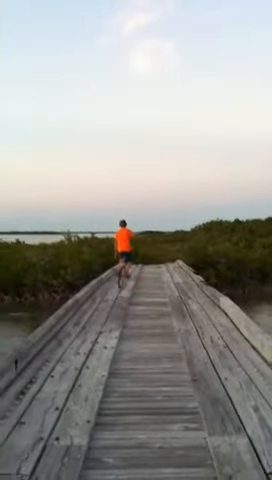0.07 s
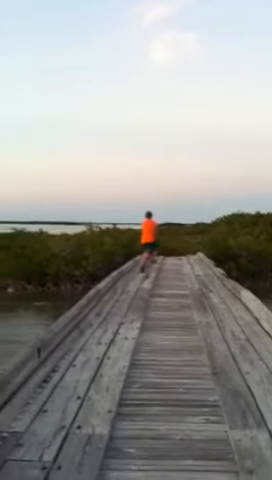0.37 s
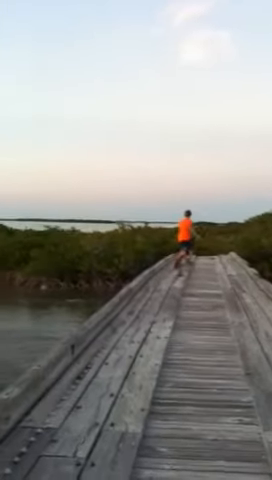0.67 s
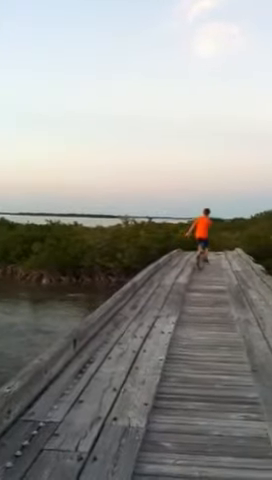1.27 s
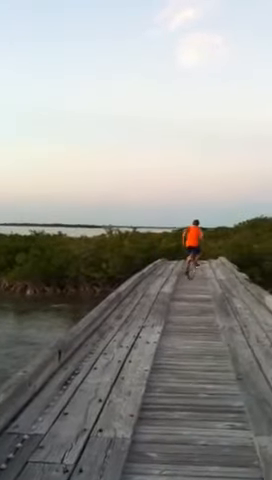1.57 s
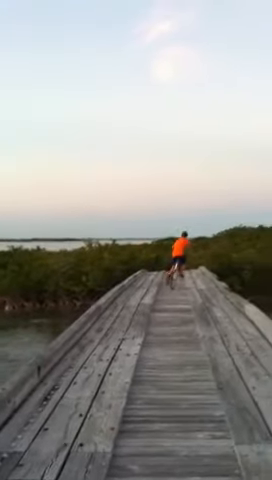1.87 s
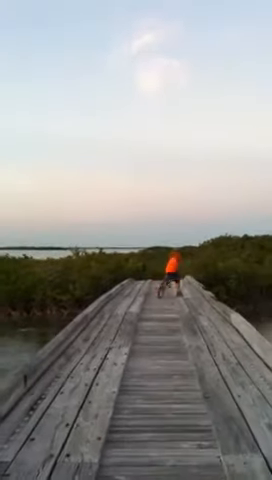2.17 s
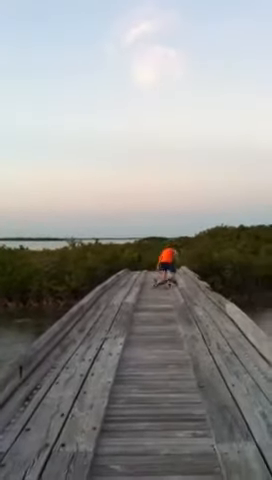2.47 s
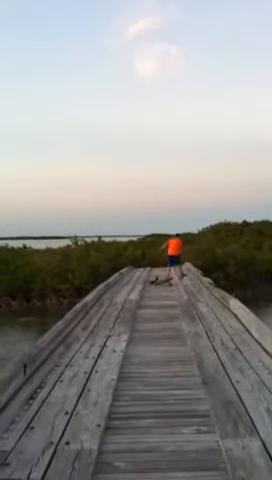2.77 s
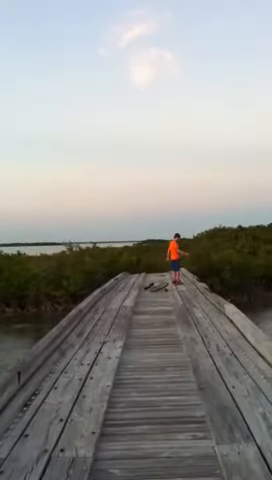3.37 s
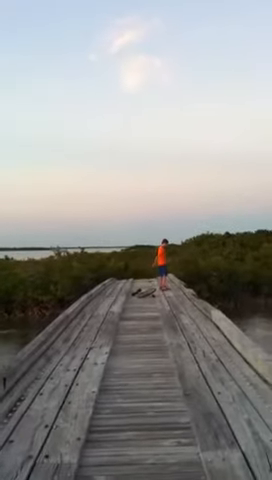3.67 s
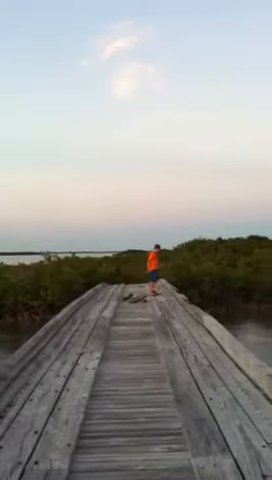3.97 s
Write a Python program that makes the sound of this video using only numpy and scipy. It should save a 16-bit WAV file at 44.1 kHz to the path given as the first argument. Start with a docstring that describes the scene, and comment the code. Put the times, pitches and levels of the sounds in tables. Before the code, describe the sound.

A unicycle slams onto wooden planks and rattles as wind buffets the microphone.

```python
"""Sea wind on the microphone, from first to last: eddies rumble, flutter and thump against it.
About two seconds in, some way along a wooden pier, a rider steps off a unicycle. Shoe and tyre scuff,
then it slams onto the planks, bounces and rattles to rest: boards and frame ring, a pedal scrapes.
Faint calls carry from far off, over the recorder's own hiss and thin whine."""
import sys
import numpy as np
from scipy import signal
from scipy.fft import rfft, irfft
from scipy.io import wavfile
from scipy.ndimage import uniform_filter1d

SR = 44100
rng = np.random.default_rng(int(sys.argv[2]) if len(sys.argv) > 2 else 0)


def file_out(sig):
    """Save sig as 16-bit WAV at sys.argv[1]."""
    # one column per channel
    cols = np.atleast_2d(sig).T
    # limit, then scale
    lim = np.clip(cols, -1, 1)
    pcm = np.round(lim * 32767).astype(np.int16)
    wavfile.write(sys.argv[1], SR, pcm)


N = 176400  # 4 s

# Levels in the tables are relative: each source sets its own gain.
# blows on the deck (time [s], plank thud [dB], frame clatter [dB], sharp tick [dB])
BLOWS = [(2.178, -27.5, -45.5, -64), (2.456, -48, -51, -47), (2.526, -13, -48, -70),
         (2.5289, -53, -28.5, -22), (2.542, -22.5, -32, -51), (2.550, -13.5, -40, -57),
         (2.6379, -59, -48, -45), (2.685, -27.5, -40, -32), (2.7241, -55, -46, -38),
         (2.7436, -46, -45, -35.5), (2.7789, -43, -44, -45), (2.860, -48, -51.5, -48),
         (2.9067, -58, -50.5, -55)]
# resonances of the planks, and of the frame and pedals (frequency [Hz], level [dB])
PLANK_MODES = [(224, -4), (366, -7), (455, -10), (501, 0), (541, -13), (592, -8), (659, -18), (692, -16),
               (770, -20), (898, -18), (997, -20)]
FRAME_MODES = [(1042, -1), (1222, -3), (1369, 0), (1481, 1), (1751, -2), (1901, -4), (2067, -4), (2155, 0),
               (2323, -1), (2530, -9), (2666, -9), (3145, -17)]
# noise of knocked wood, rattling frame, hard contact and rubbing (frequency [Hz], level [dB])
KNOCK_SPECTRUM = [(80, -30), (250, -4), (400, 1), (520, 1), (640, -4), (780, -13), (1100, -21), (2500, -44),
                  (8000, -70)]
CLATTER_SPECTRUM = [(200, -1), (600, 14.5), (1100, 3), (1500, 3.5), (2250, 0), (2800, -11), (9000, -23),
                    (16000, -26)]
TICK_SPECTRUM = [(500, 12.5), (2000, 6), (4000, -1), (7200, -5), (8500, 2), (10000, -9), (11500, -5),
                 (14000, -15), (17000, -30)]
SCUFF_SPECTRUM = [(300, -8), (1000, 0.5), (4200, -8), (7000, -17), (15000, -25)]
# shoe and tyre rubbing the wood (centre time [s], half width [s], level [dB])
SCUFFS = [(2.178, 0.0075, -65), (2.452, 0.012, -57.5)]
# a pedal sliding along the boards (time [s], ringing pitch [Hz], level [dB])
PEDAL_SLIDE = [(2.71, 1500, -82), (2.728, 1510, -53), (2.765, 1620, -68), (2.79, 1880, -72),
               (2.835, 1840, -66), (2.88, 2150, -67.5), (2.96, 2120, -82)]
# gusts at the microphone (time [s], rumble level [dB], flutter level [dB])
GUSTS = [(0, -63, -65.5), (.11, -76, -65), (0.171, -48.5, -68), (.3, -56.5, -87), (0.489, -42.5, -56),
         (0.549, -51, -76), (0.606, -31, -51), (0.678, -49.5, -73), (0.716, -39, -62), (.79, -65, -83),
         (.87, -49.5, -70), (0.936, -25, -27), (0.997, -37, -46), (1.048, -23.5, -29), (1.107, -27, -29),
         (1.133, -40, -47), (1.151, -21.5, -31.5), (1.239, -28, -31.5), (1.269, -31, -48),
         (1.339, -29.5, -34.5), (1.42, -30.5, -41), (1.486, -23.5, -23), (1.55, -24, -39.5),
         (1.66, -23.5, -33), (1.705, -23.5, -47), (1.781, -38.5, -52.5), (1.838, -28, -40),
         (1.92, -23, -29.5), (1.999, -20.5, -31.5), (2.073, -30.5, -47.5), (2.19, -32, -37.5),
         (2.262, -37.5, -49.5), (2.351, -28.5, -40), (2.42, -42.5, -75), (2.488, -33.5, -39),
         (2.56, -33.5, -73), (2.63, -31, -43), (2.69, -43.5, -41.5), (2.795, -36, -60), (2.84, -47, -78),
         (2.89, -27.5, -69), (2.941, -48, -51), (3.001, -31, -45.5), (3.092, -62, -82), (3.167, -27, -65),
         (3.21, -48.5, -54), (3.27, -24, -31.5), (3.33, -32.5, -52), (3.431, -33.5, -57), (3.461, -53, -62),
         (3.487, -28.5, -45.5), (3.529, -44, -65), (3.687, -56, -79), (3.759, -26, -61),
         (3.82, -35.5, -50.5), (3.879, -25, -31), (3.931, -18, -25.5), (4.0, -28, -33)]
# the wind's rumble, low roll, small eddies and finest eddies (frequency [Hz], level [dB])
RUMBLE_SPECTRUM = [(20, -44), (48, -43), (100, -10.5), (140, -3), (185, 1.5), (285, -4), (370, -12),
                   (520, -28), (1500, -74.5)]
ROLL_SPECTRUM = [(25, -17.5), (55, -1), (130, 13.5), (200, 18.5), (400, -45.5)]
FLUTTER_SPECTRUM = [(30, -48), (180, -7), (330, 2), (550, -4), (800, -18.5), (1600, -42), (2200, -71)]
FINE_SPECTRUM = [(200, -38), (600, 19.5), (1000, -10), (2000, -23), (3000, -45)]
# big eddies hitting the microphone, the narrow ones sharper (time [s], peak [dB], half width [s])
BUFFETS = [(.174, -30.5, 0.0023), (0.492, -24.5, 0.0017), (0.599, -24.5, 0.0013), (.632, -30.5, 0.001),
           (.945, -25, .0008), (.973, -24, 0.00082), (1.039, -16.5, 0.0011), (1.091, -19, 0.00046),
           (1.115, -15, 0.00074), (1.155, -25, 0.00048), (1.223, -26, 0.00075), (1.343, -16, 0.00091),
           (1.392, -17, 0.00077), (1.489, -21, 0.00044), (1.5, -22, 0.00043), (1.52, -30, 0.00039),
           (1.566, -15.5, 0.00067), (1.646, -18, 0.00068), (1.838, -23, 0.00062), (1.932, -20.5, 0.00072),
           (1.944, -18.5, 0.00075), (1.972, -17.5, 0.00087), (2.001, -16, 0.00079), (2.067, -19.5, 0.00088),
           (2.141, -21.5, 0.0009), (2.307, -21.5, 0.001), (2.366, -17.5, 0.001), (3.16, -19, 0.0012),
           (3.239, -15.5, 0.00097), (3.276, -19, 0.00077), (3.302, -12.5, 0.00096), (3.307, -36, 0.00024),
           (3.867, -17, .00066), (3.92, -13.5, 0.0008), (3.954, -14, 0.00083), (3.978, -14.5, 0.0009)]
# far calls, perhaps a bird (centre time [s], half width [s], level [dB], pitch [Hz], glide [Hz/s])
FAR_CALLS = [(0.157, 0.05, -69, 499, 62), (3.407, 0.063, -72, 507, 1), (3.495, 0.03, -70.5, 490, -350)]
# overtones of a call (multiple of the pitch [-], level [dB])
CALL_OVERTONES = [(2, -5), (3, -6), (4, 0), (7, -5)]
# the recorder's noise floor (frequency [Hz], level [dB])
HISS_SPECTRUM = [(30, 14), (200, -4), (600, 8.5), (1200, -1), (2500, -3), (6000, -4), (10000, -6),
                 (17000, -10)]

PLANK_DB, PLANK_T60_S, KNOCK_DB, KNOCK_T60_S = -5, .16, -6, .06
FRAME_DB, FRAME_T60_S, CLATTER_DB, CLATTER_T60_S = -8, .19, -9, .26
CONTACT_S, TICK_T60_S, TICK_TAIL_DB, TICK_TAIL_T60_S = .00078, .024, -31, .17
SLIPS_PER_S, SLIP_T60_S = 170, .027
RUMBLE_DB, PUFFS_PER_S, PUFF_DB, STEADY_S = 1, 28, 1.6, .13
FLUTTER_DB, EDDIES_PER_S, EDDY_SCATTER_DB = -1, 380, 5.5
STRONG_GUST_DB, ROLL_DB, FINE_DB = -30, -42, -65  # a strong gust, and these two layers' levels in it
ROLL_GROWTH, FINE_GROWTH = .27, 3  # dB gained per dB of gust
BUFFET_DB, BUFFET_LOW_HZ = 1, 171.5
CALL_WAVER, CALL_WAVERS_PER_S, CALL_ECHO_T60_S = .045, 140, .66
MIC_LOW_HZ, TOP_HZ = 65.6, 17200
HISS_DB, WHINE_DB, WHINE_HZ = -65, -73.5, 14999


def unicycle_blows():
    """Each blow thuds in the planks, rattles the frame and ticks where hard parts meet the wood."""
    out, t = np.zeros(N), np.arange(SR // 2) / SR
    noises = [noise(KNOCK_SPECTRUM), noise(CLATTER_SPECTRUM), noise(TICK_SPECTRUM)]
    push = 1 - np.exp(-(t / CONTACT_S) ** 2)  # the thud builds up during contact
    for start, thud_db, clatter_db, tick_db in BLOWS:
        i = rng.integers(N - len(t))
        knock, clatter, tick = (x[i:i + len(t)] for x in noises)
        plank = undb(PLANK_DB) * ring(t, PLANK_MODES, PLANK_T60_S, scatter_db=1)
        plank += undb(KNOCK_DB) * knock * fade(t, KNOCK_T60_S)
        frame = undb(FRAME_DB) * ring(t, FRAME_MODES, FRAME_T60_S, scatter_db=3)
        frame += undb(CLATTER_DB) * clatter * fade(t, CLATTER_T60_S)
        contact = tick * (fade(t, TICK_T60_S) + undb(TICK_TAIL_DB) * fade(t, TICK_TAIL_T60_S)) / 2
        blow = undb(thud_db) * plank * push + undb(clatter_db) * frame + undb(tick_db) * contact
        add(out, start, blow)
    return out


def scuffs(t):
    """Shoe and tyre rub the boards in short, gritty strokes."""
    grit = rng.standard_normal(N) ** 3  # cubing makes the noise spiky
    return colour(grit, SCUFF_SPECTRUM) * swells(t, SCUFFS)


def pedal_scrape(t):
    """The pedal sticks and slips; each slip rings a resonance that climbs as it slides."""
    when, hz, db = np.array(PEDAL_SLIDE).T
    slips = (rng.random(N) < SLIPS_PER_S / SR) * rng.standard_normal(N)
    carrier = np.exp(2j * np.pi * np.cumsum(np.interp(t, when, hz)) / SR)
    # each slip's decay follows the moving pitch
    ringing = carrier * signal.fftconvolve(slips / carrier, fade(t[:SR // 10], SLIP_T60_S))[:N]
    return unit(ringing.imag) * undb(np.interp(t, when, db, left=-np.inf, right=-np.inf))


def wind(t):
    """Turbulence rumbles on the microphone over a low roll; eddies flutter, finer in strong gusts."""
    when, rumble_points, flutter_points = np.array(GUSTS).T
    rumble_db, flutter_db = np.interp(t, when, rumble_points), np.interp(t, when, flutter_points)
    rumble = steady(noise(RUMBLE_SPECTRUM), STEADY_S)
    rumble *= undb(rumble_db + RUMBLE_DB + PUFF_DB * wander(PUFFS_PER_S))
    roll = noise(ROLL_SPECTRUM) * undb(ROLL_DB + ROLL_GROWTH * (rumble_db - STRONG_GUST_DB))
    eddies = (rng.random(N) < EDDIES_PER_S / SR) * rng.choice([-1, 1], N)
    eddies = eddies * undb(EDDY_SCATTER_DB * rng.standard_normal(N))
    flutter = steady(colour(eddies, FLUTTER_SPECTRUM), 2 * STEADY_S) * undb(flutter_db + FLUTTER_DB)
    fine = steady(colour(eddies, FINE_SPECTRUM), 2 * STEADY_S)
    fine *= undb(FINE_DB + FINE_GROWTH * (flutter_db - STRONG_GUST_DB))
    return rumble + roll + flutter + fine


def buffets(t):
    """A big eddy is a brief pressure bump; the microphone passes only its quick part and swings back."""
    out = np.zeros(N)
    high_pass = signal.butter(3, BUFFET_LOW_HZ, "high", fs=SR, output="sos")
    for when, db, half_width in BUFFETS:
        near = np.abs(t - when) < .04
        pressure = 1 / (1 + ((t[near] - when) / half_width) ** 2)
        thump = signal.sosfilt(high_pass, pressure)
        out[near] += undb(db + BUFFET_DB) * thump / np.abs(thump).max()
    return out


def far_calls(t):
    """Short nasal calls, blurred by echoes on their long way over water and scrub."""
    out = np.zeros(N)
    waver = 1 + CALL_WAVER * wander(CALL_WAVERS_PER_S)
    for when, half_width, db, hz, glide in FAR_CALLS:
        phase = 2 * np.pi * np.cumsum((hz + glide * (t - when)) * waver) / SR
        voice = sum(undb(tone_db) * np.sin(k * phase) for k, tone_db in CALL_OVERTONES)
        out += unit(voice) * swells(t, [(when, half_width, db)])
    echoes = rng.standard_normal(SR) * fade(t[:SR], CALL_ECHO_T60_S)
    return signal.fftconvolve(out, echoes / np.linalg.norm(echoes))[:N]


def ring(t, modes, t60, scatter_db):
    """Decaying modes set off from rest; each point of contact weights them a little differently."""
    hz, db = np.array(modes, float).T[:, :, None]
    gains = undb(db + scatter_db * rng.standard_normal(db.shape))
    tones = np.sum(gains * np.sin(2 * np.pi * hz * t), axis=0)
    return tones * fade(t, t60) / np.sqrt(np.sum(gains ** 2)) / 2


def colour(x, spectrum):
    """Filter through (frequency [Hz], level [dB]) points, to an rms of 1."""
    hz, db = np.array(spectrum, float).T
    bins_hz = np.maximum(np.fft.rfftfreq(N, 1 / SR), 1)
    gains = undb(np.interp(np.log(bins_hz), np.log(hz), db))
    cepstrum = irfft(np.log(gains), N)
    cepstrum[1:N // 2] *= 2  # folded onto positive time, so the filter is causal
    cepstrum[N // 2 + 1:] = 0
    return unit(irfft(rfft(x) * np.exp(rfft(cepstrum)), N))


def noise(spectrum):
    """Random noise with the given spectrum."""
    return colour(rng.standard_normal(N), spectrum)


def steady(x, seconds):
    """Even out swells slower than the given time."""
    size = max(int(seconds * SR / 2), 1)
    power = uniform_filter1d(uniform_filter1d(x ** 2, size), size)
    return x / np.sqrt(np.abs(power) + 1e-12)


def wander(rate):
    """Random values held 1 / rate seconds and smoothed twice, at an rms of 1."""
    size = int(SR / rate)
    held = np.repeat(rng.standard_normal(N // size + 1), size)
    return unit(uniform_filter1d(uniform_filter1d(held, size // 2), size // 2)[:N])


def swells(t, rows):
    """A bell-shaped swell for each row of (centre time [s], half width [s], level [dB])."""
    return sum(undb(db) * np.exp(-.5 * ((t - when) / half_width) ** 2) for when, half_width, db in rows)


def fade(t, t60):
    """Decay from t = 0, falling 60 dB in t60 seconds."""
    return (t >= 0) * np.exp(-np.log(1000) * np.maximum(t, 0) / t60)


def add(out, start, sound):
    """Mix a sound in at a start time in seconds."""
    i = int(start * SR)
    out[i:i + len(sound)] += sound[:max(N - i, 0)]


def undb(db):
    """Decibels to gain."""
    return 10 ** (np.asarray(db) / 20)


def unit(x):
    """Scale to an rms of 1."""
    return x / np.sqrt(np.mean(x ** 2))


def scene():
    """One microphone on the pier: wind right on it, the fall further along, calls far away."""
    t = np.arange(N) / SR
    return (wind(t) + buffets(t) + unicycle_blows() + scuffs(t) + pedal_scrape(t) + far_calls(t))[None]


def record(dry):
    """The microphone drops the deep bass; the recorder adds hiss and a thin whine, and cuts the top."""
    heard = signal.sosfilt(signal.butter(3, MIC_LOW_HZ, "high", fs=SR, output="sos"), dry)
    whine = np.sqrt(2) * undb(WHINE_DB) * np.sin(2 * np.pi * WHINE_HZ * np.arange(N) / SR)
    hiss = undb(HISS_DB) * noise(HISS_SPECTRUM)
    low_pass = signal.ellip(10, .2, 80, TOP_HZ, fs=SR, output="sos")
    return signal.sosfilt(low_pass, heard + whine + hiss)


dry = scene()
out = record(dry)
file_out(out)
```